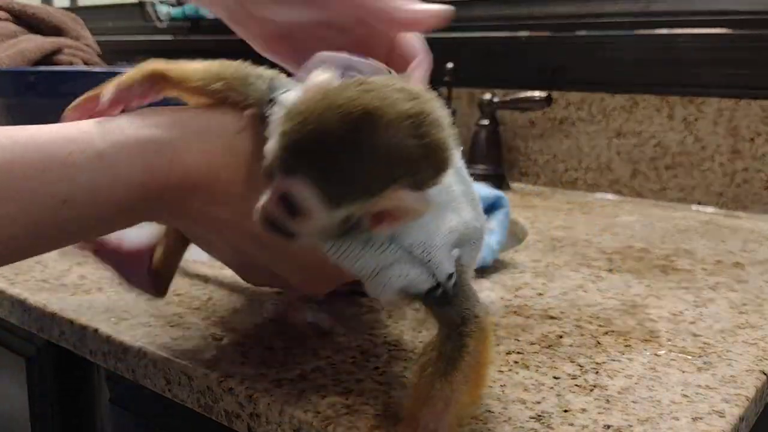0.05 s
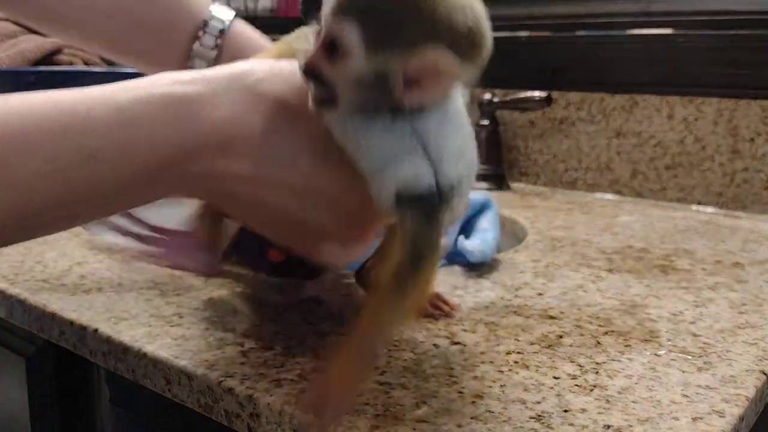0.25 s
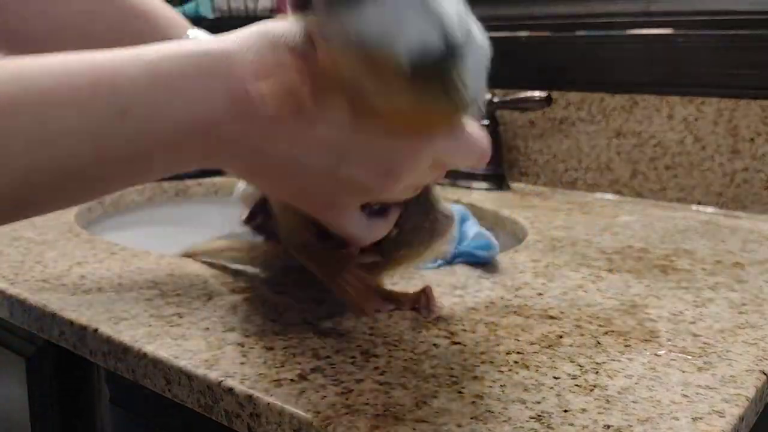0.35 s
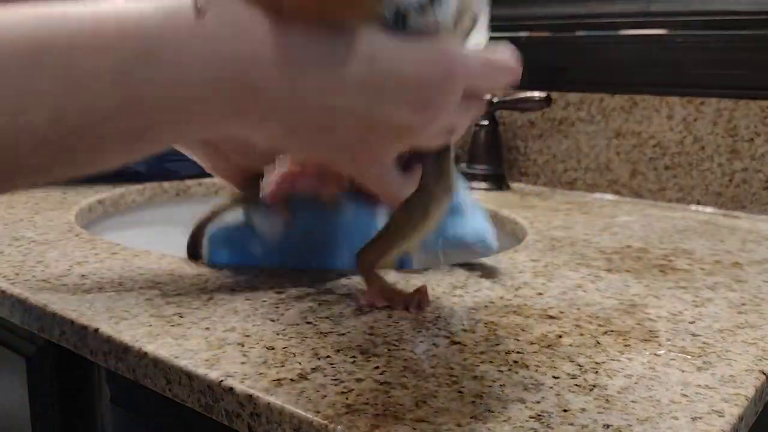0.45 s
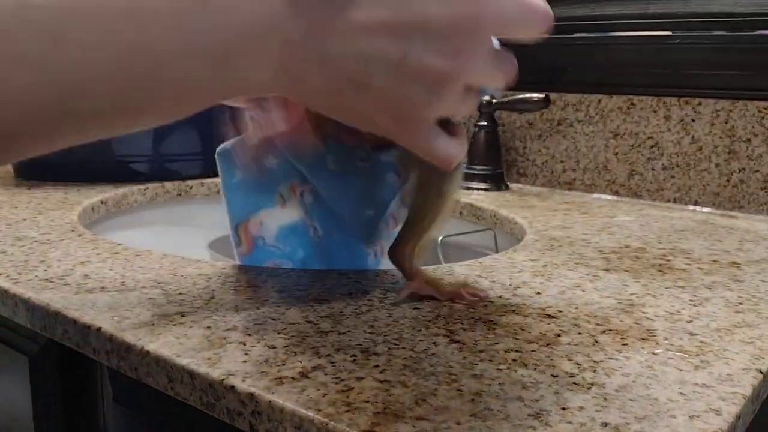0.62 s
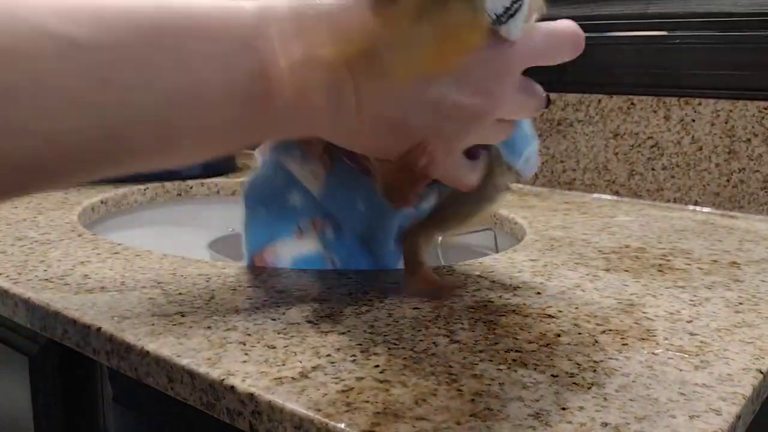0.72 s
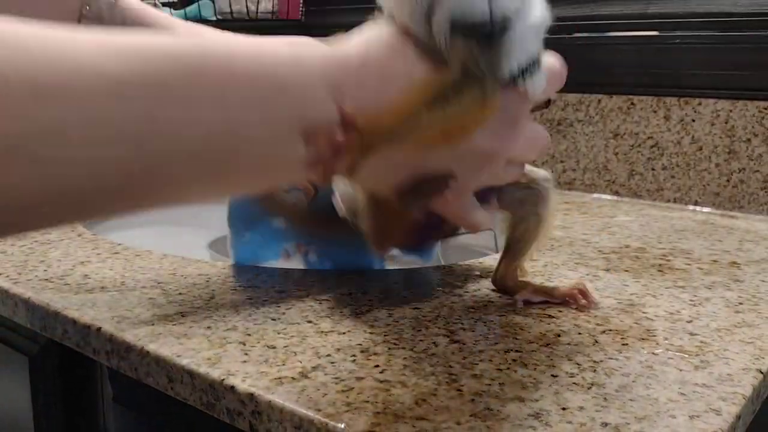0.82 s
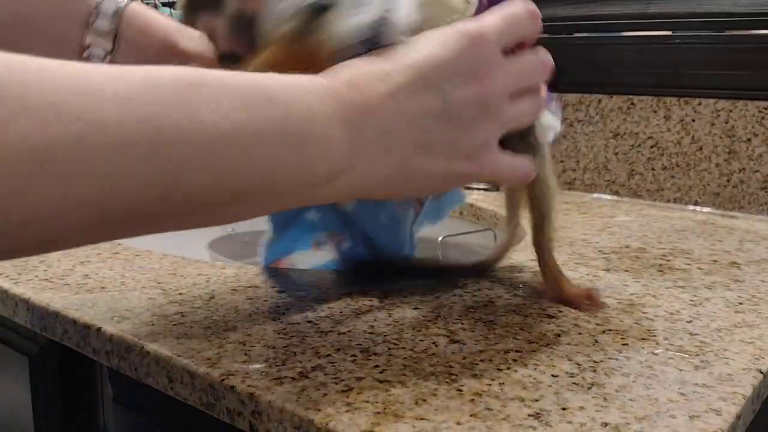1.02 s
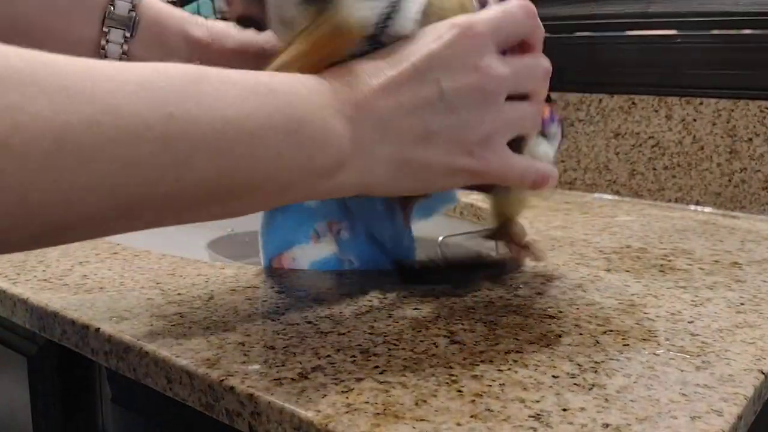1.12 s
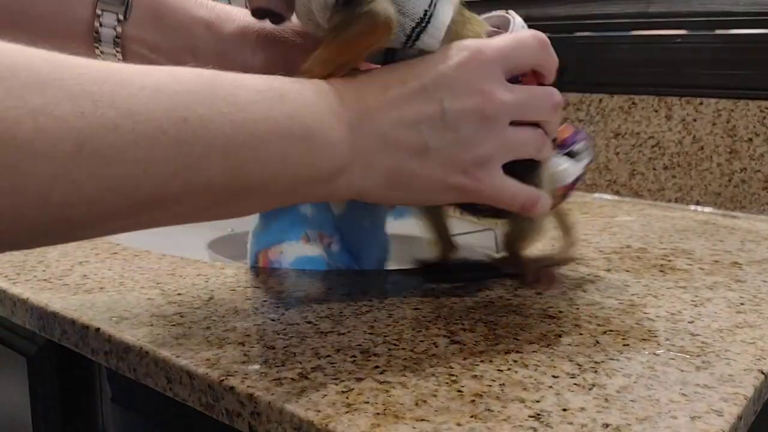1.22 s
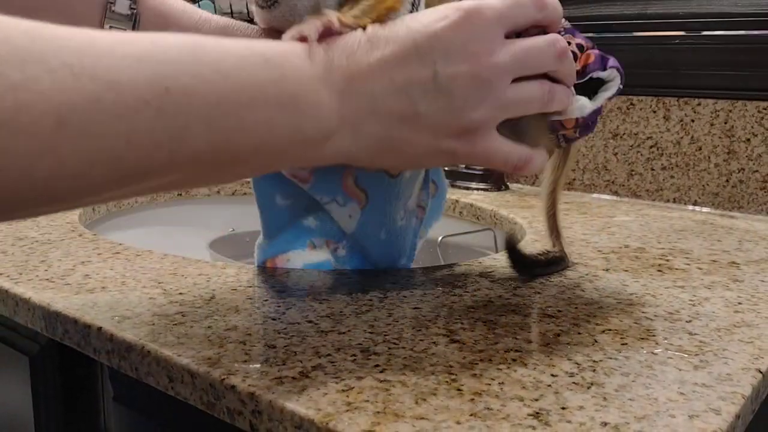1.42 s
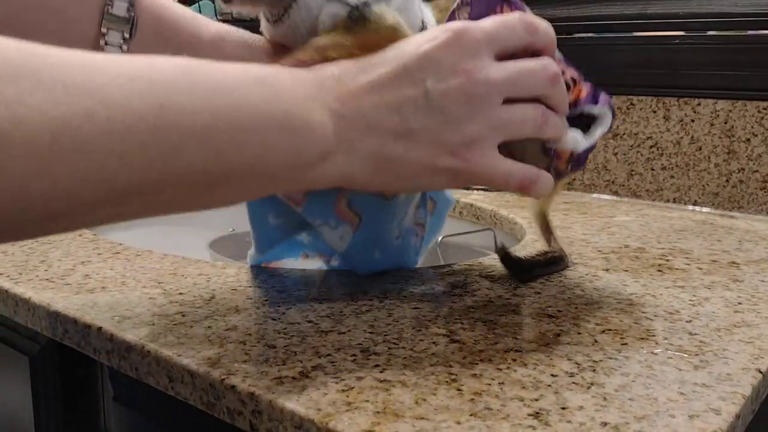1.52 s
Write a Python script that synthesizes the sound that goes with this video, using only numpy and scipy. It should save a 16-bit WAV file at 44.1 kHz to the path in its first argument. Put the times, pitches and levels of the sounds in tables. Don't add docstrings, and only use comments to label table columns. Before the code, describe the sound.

A small monkey's piercing whistle chirps upward, holds about a quarter second and drops, smeared by hard bathroom walls; very faint thumps on a stone counter and cloth rubs surround it, close stereo microphone, call toward the left.

```python
import sys
import numpy as np
from scipy import signal
from scipy.fft import rfft, irfft
from scipy.io import wavfile
from scipy.ndimage import uniform_filter1d, minimum_filter1d

SR = 44100
rng = np.random.default_rng(int(sys.argv[2]) if len(sys.argv) > 2 else 0)


def waveform_to_disk(signal):
    frames = np.transpose(np.atleast_2d(signal))
    scaled = np.clip(frames, -1, 1) * 32767
    samples = np.round(scaled).astype(np.int16)
    wavfile.write(sys.argv[1], SR, samples)


def elevation(decibels):
    levels = np.asarray(decibels, float)
    return 10 ** (levels / 20)


N = 68355
TIME_S = np.arange(N) / SR


def evened(x):
    return x / np.sqrt(np.mean(x ** 2) + 1e-20)


def read(points, hz):
    f, value = np.transpose(points)
    return np.interp(np.log(hz + 1), np.log(f + 1), value)


def colour(x, gain):
    return irfft(rfft(x) * gain(np.fft.rfftfreq(N, 1 / SR)), N)


def bell(centre_s, half_s):
    return np.exp(-.5 * ((TIME_S - centre_s) / half_s) ** 2)


# (frequency [Hz], likeness [0..1])
LIKENESS = [(60, 0.36), (240, 0.82), (950, 0.083), (3770, 0.14), (15000, 0.02)]


def pair(a, b):
    def shared(f):
        return np.clip((read(LIKENESS, f) - .3) / .7, 0, 1) ** .5

    right = colour(a, shared) + colour(b, lambda f: np.sqrt(1 - shared(f) ** 2))
    return np.array([a, right])


def voice(*parts):
    wobble_hz, wobble_s, breath_db, breath_hz, top_hz = 25, .004, -54, 1500, 16000
    s, hz, db, octave_db = np.transpose([row for part in parts for row in part])
    pitch = uniform_filter1d(np.interp(TIME_S, s, hz), size=110)
    tremble = rng.standard_normal(N)
    for _ in range(2):
        tremble = uniform_filter1d(tremble, int(wobble_s * SR))
    pitch = pitch + wobble_hz * evened(tremble)
    phase = 2 * np.pi * np.cumsum(pitch) / SR
    breath = evened(colour(rng.standard_normal(N), lambda f: 1 / (1 + (f / breath_hz) ** 2)))
    octave = elevation(np.interp(TIME_S, s, octave_db))
    octave = octave * np.clip((top_hz - 2 * pitch) / 400 + 1, 0, 1)
    tone = (1 + elevation(breath_db) * breath) * np.sin(phase) + octave * np.sin(2 * phase)
    sounding = (TIME_S > s[0]) & (TIME_S < s[-1])
    edge = uniform_filter1d(sounding * 1., size=40)
    return np.sqrt(2) * elevation(np.interp(TIME_S, s, db)) * edge * tone


# (frequency [Hz], t60 [s])
TILE_DECAY = [(1000, .4), (7000, .31), (8500, .35), (10000, .4), (15000, .31)]


def tiles(x):
    bend_db_per_s2, first_echo_s = 251, .003
    t = np.arange(SR // 2) / SR
    taps = rng.standard_normal((2, len(t))) * (rng.random((2, len(t))) < .15)
    hz, at, z = signal.stft(taps, SR, nperseg=128)
    decay_db = -60 * at / read(TILE_DECAY, hz)[:, None] - bend_db_per_s2 * at ** 2
    taps = signal.istft(z * elevation(decay_db), SR, nperseg=128)[1][:, :len(t)]
    taps = taps * (t > first_echo_s)
    return signal.fftconvolve(np.atleast_2d(x), taps / np.linalg.norm(taps[0]), axes=1)[:, :N]


# (time [s], pitch [Hz], level [dB], octave relative level [dB])
CHIRP_PATH = [(.2262, 6950, -27, -18.5), (.228, 7010, -22, -18.5), (.235, 7212, -12, -21),
              (.242, 7520, -11.5, -22.5), (.247, 8090, -12, -23.5), (.249, 8080, -28, -26.5)]
WHISTLE_PATH = [(.252, 8720, -18.5, -17), (0.263, 9280, -29.5, -50), (0.266, 9556, -13, -59),
                (.285, 9683, -22, -71.5), (0.326, 9990, -12, -64), (0.364, 9976, -14, -44),
                (0.394, 10060, -9, -61), (.432, 9789, -19.5, -50), (0.483, 9513, -17.5, -51.5)]
DROP_PATH = [(.499, 9200, -13, -45), (.51, 8750, -13, -45), (.514, 8100, -19, -30), (.517, 7300, -32, -24),
             (.519, 6800, -46, -25)]
SQUEAK_PATH = [(.64, 14150, -74, -60), (.665, 14000, -63, -60), (.69, 13600, -63, -60),
               (.712, 13000, -68, -60)]
SIDE_PATH = [(.248, 11750, -56, -60), (.255, 11750, -50, -60), (.268, 11700, -62, -60)]


def monkey():
    pan_db, lag_s, room_db, treble_pan_db = 4.8, .00004, 2, 1.5
    call = voice(CHIRP_PATH, WHISTLE_PATH, DROP_PATH)
    mouth = call + voice(SQUEAK_PATH) + voice(SIDE_PATH)
    late = colour(mouth, lambda f: np.exp(-2j * np.pi * f * lag_s))
    direct = np.array([mouth * elevation(pan_db), late * elevation(-pan_db)])
    heard = direct + elevation(room_db) * tiles(call)
    return colour(heard, lambda f: elevation(treble_pan_db * np.outer([1, -1], f > 12000)))


# (time [s], peak level [dB], rattle level [dB])
FOOTFALLS = [(.0, -56, -29), (0.084, -61, -37), (0.171, -49, -25), (0.291, -44.5, -11.5), (0.399, -56, -21),
             (0.732, -62, -14.5), (0.91, -46, -20.5), (1.272, -49, -16.5), (1.402, -61.5, -17.5)]
# (frequency [Hz], level [dB], t60 [s])
COUNTER_MODES = [(97, 0, .42), (124, -2, .34), (150, -10, .15)]


def thumps():
    rise_s, rattle_rise_s, rattle_t60_s, rattle_hz = .013, .0085, .36, 550
    out, t = np.zeros((2, N + SR)), np.arange(SR // 2) / SR
    noise = pair(*rng.standard_normal((2, N)))
    rattle = colour(noise, lambda f: 1 / (1 + (270 / (f + 1)) ** 6) / (1 + (f / rattle_hz) ** 2))
    rattle = evened(rattle)[:, :len(t)]
    press = np.sin(np.pi / 2 * np.minimum(t / rise_s, 1)) ** 2
    for s, db, rattle_db in FOOTFALLS:
        ring = 0
        for hz, mode_db, t60 in COUNTER_MODES:
            mode_hz = hz * rng.uniform(.98, 1.02)
            ring = ring + elevation(mode_db - 60 * t / t60) * np.sin(2 * np.pi * mode_hz * t)
        shake = elevation(rattle_db - 60 * t / rattle_t60_s) * np.roll(rattle, rng.integers(len(t)), 1)
        shake = shake * np.minimum(t / rattle_rise_s, 1)
        out[:, round(s * SR):][:, :len(t)] += elevation(db - 2.0) * (ring * press + shake)
    return out[:, :N]


# (centre time [s], half length [s], level [dB], brightness [dB per octave])
STROKES = [(0.054, 0.068, -73, -1), (0.133, 0.022, -53, 3.46), (0.383, 0.0073, -54, 3),
           (0.477, 0.063, -54, 5), (0.618, 0.018, -62.5, 4), (0.678, 0.022, -53, 7.6),
           (0.733, .005, -58.5, 1), (1.012, 0.053, -63, 1.9), (1.093, .004, -57, 3.5),
           (1.11, 0.025, -61, 0.5), (1.275, 0.12, -66, 2), (1.459, 0.021, -56, 3),
           (1.54, 0.031, -64.5, 1.5)]
# (frequency [Hz], density [dB per Hz])
RUB_SPECTRUM = [(290, -39.5), (500, -22.5), (708, -7), (843, -27.5), (974, -9), (2100, -7), (4150, -17.5),
                (6060, -10), (16000, -25)]


def rubs():
    grains_per_s, grain_db = 4000, 2.5
    out = np.zeros((2, N))
    for s, half, db, tilt_db in STROKES:
        noise = rng.standard_normal((2, N))
        catches = rng.random(N) < grains_per_s / SR
        catch_size = elevation(grain_db * np.minimum(rng.exponential(1, N), 4))
        grains = noise * (0.27 + catches * catch_size)

        def spectrum(f):
            return elevation(read(RUB_SPECTRUM, f) + tilt_db * np.log2(f / 3000 + 0.011)) * (f > 300)

        out += elevation(db) * evened(colour(grains, spectrum)) * bell(s, half)
    out = pair(*out)
    return out + elevation(-4.5) * tiles(out)


# (centre time [s], half length [s], level [dB], frequency [Hz], width [Hz])
PUFF_EVENTS = [(0.23, 0.0029, -55.5, 5150, 1900), (.31, .04, -65.5, 5430, 800),
               (.43, 0.035, -58, 5160, 1800), (.518, .006, -50.5, 5400, 2006),
               (.5, 0.032, -61.5, 14200, 250), (0.496, 0.019, -57, 15550, 394),
               (.516, .003, -52, 15600, 600), (.565, .018, -63, 14050, 420), (.61, .02, -64, 14150, 400),
               (.63, 0.0034, -68, 13500, 3600), (.47, 0.036, -54.5, 7300, 920),
               (.6, 0.027, -71.5, 600, 500), (.68, .02, -71, 650, 500), (.69, 0.034, -60.5, 6800, 1300),
               (0.77, 0.0091, -61.5, 1700, 1600), (0.885, 0.0016, -58, 1250, 530),
               (1.455, 0.018, -60.5, 1850, 1186), (0.91, 0.019, -71.5, 2100, 1200)]


def puffs():
    out = np.zeros((2, N))
    for s, half, db, hz, width in PUFF_EVENTS:
        band = colour(rng.standard_normal((2, N)), lambda f: 1 / (1 + (2 * (f - hz) / width) ** 4))
        out += elevation(db) * evened(band) * bell(s, half)
    return pair(*out)


# (frequency [Hz], density [dB per Hz])
HISS_SPECTRUM = [(18, -43.5), (30, -24), (252, -1.5), (1070, -10), (1860, -15), (3400, -10), (3870, -7.5),
                 (7870, -9), (16000, -13.5)]
# (frequency [Hz], width [Hz], level [dB])
FAN_LINES = [(121, 16, -72), (242.7, 21.2, -79), (99, 32, -74.5), (7600, 1100, -75.5), (1550, 89, -77.5),
             (2413, 250, -75.5), (40, 40, -85)]


def air():
    hiss_db, lull_s, lull_half_s, lull_depth_db, pan_db = -65.5, .82, .03, -4.5, .4
    noise = pair(*rng.standard_normal((2, N)))
    hiss = elevation(hiss_db + 0.5) * evened(colour(noise, lambda f: elevation(read(HISS_SPECTRUM, f))))
    for hz, width, db in FAN_LINES:
        noise = pair(*rng.standard_normal((2, N)))
        line = colour(noise, lambda f: 1 / (1 + (2 * (f - hz) / width) ** 2))
        hiss = hiss + elevation(db) * evened(line)
    lull_db = lull_depth_db * bell(lull_s, lull_half_s)
    return hiss * elevation(lull_db + pan_db * np.array([[1], [-1]]))


def whine():
    whine_hz, whine_db, wobble_rad = 248, -79, 0.58
    drift = evened(colour(rng.standard_normal(N), lambda f: 1 / (1 + (f / 6.1) ** 2)))
    return np.sqrt(2) * elevation(whine_db) * np.sin(2 * np.pi * whine_hz * TIME_S + wobble_rad * drift)


def scene():
    return monkey() + thumps() + rubs() + puffs() + air() + whine()


def limit(x):
    ceiling = .96
    gain = minimum_filter1d(np.minimum(ceiling / (abs(x).max(0) + 1e-9), 1), size=801)
    return x * uniform_filter1d(uniform_filter1d(gain, size=400), size=400)


def mask(x):
    lower_hz, lower_db, upper_hz, upper_db, bins = 5600, -62, 10350, -52, 24
    hz, at, z = signal.stft(x, SR, nperseg=2048, noverlap=1536)
    power = (abs(z) ** 2).mean(0)
    band = np.arange(len(hz)) // bins
    band_power = np.add.reduceat(power, np.arange(0, len(hz), bins), 0)
    share = band_power[band] / power.sum(0)
    bar_db = np.where(hz < upper_hz, lower_db, upper_db)[:, None]
    keep = (share > elevation(2 * bar_db)) | (hz[:, None] < lower_hz)
    return signal.istft(z * keep, SR, nperseg=2048, noverlap=1536)[1][:, :N]


def roll_off(x):
    return signal.sosfilt(signal.butter(12, 16810, fs=SR, output="sos"), x)


def record(dry):
    low_cut_hz, edge_hz = 80, 15750
    x = colour(dry, lambda f: 1 / np.sqrt(1 + (low_cut_hz / (f + 1)) ** 3))
    band_limit = signal.firwin(511, edge_hz, window=("kaiser", 9), fs=SR)
    x = signal.oaconvolve(x, band_limit[None], "same")
    mix = mask(limit(x))
    return roll_off(mix)


dry = scene()
out = record(dry)
waveform_to_disk(out)
```